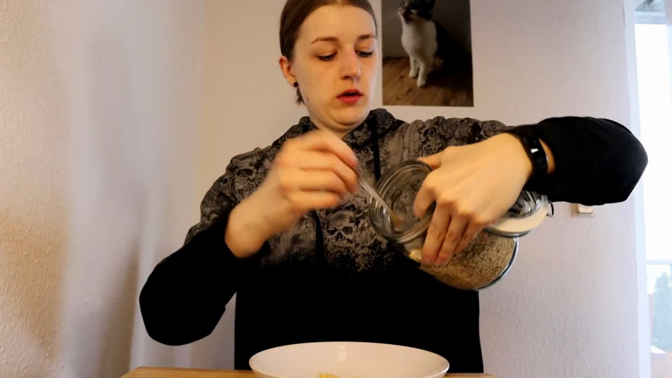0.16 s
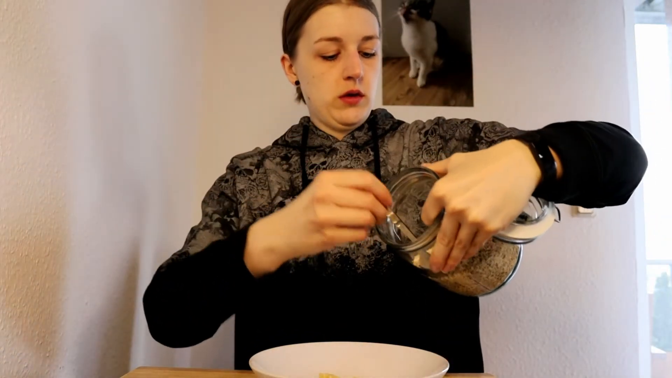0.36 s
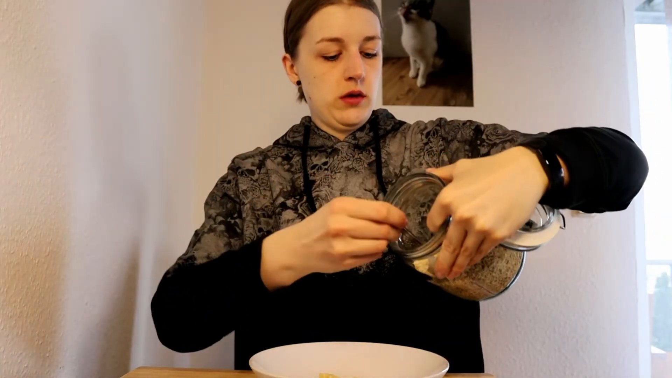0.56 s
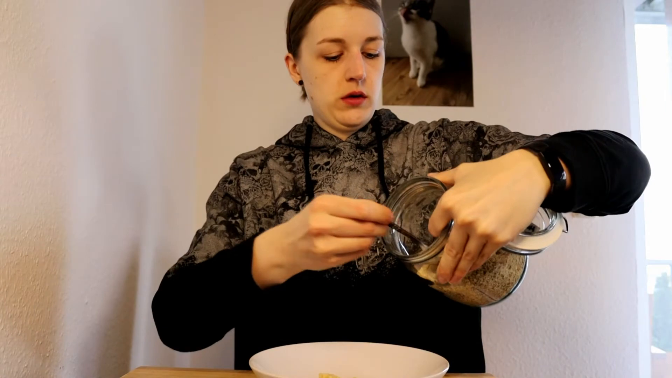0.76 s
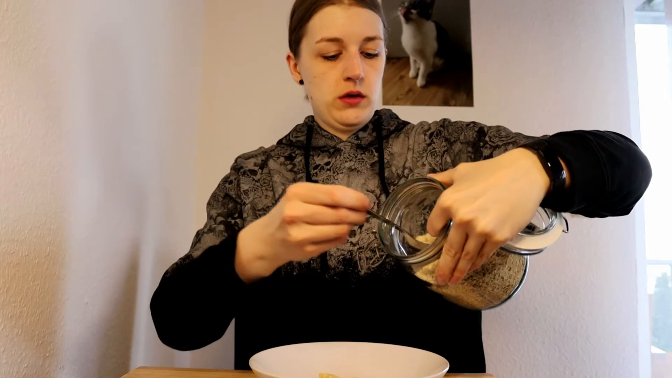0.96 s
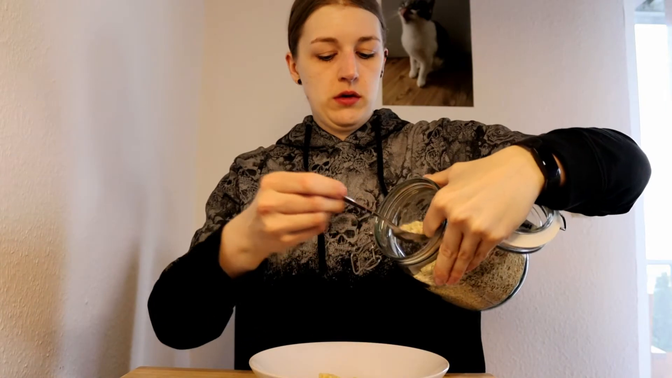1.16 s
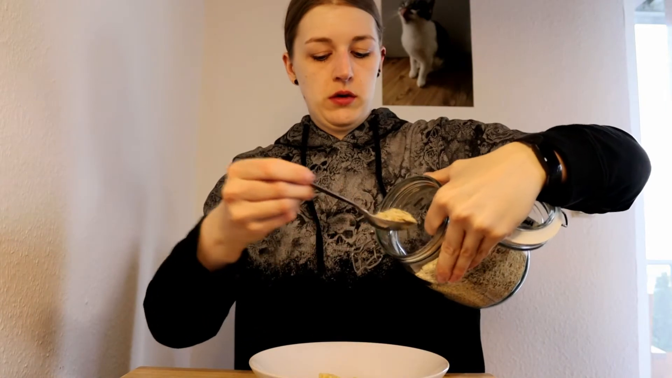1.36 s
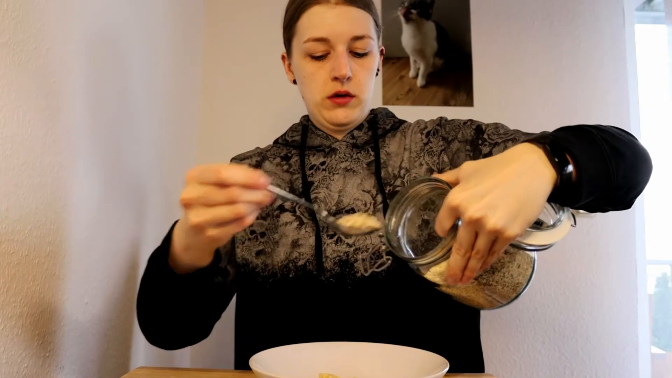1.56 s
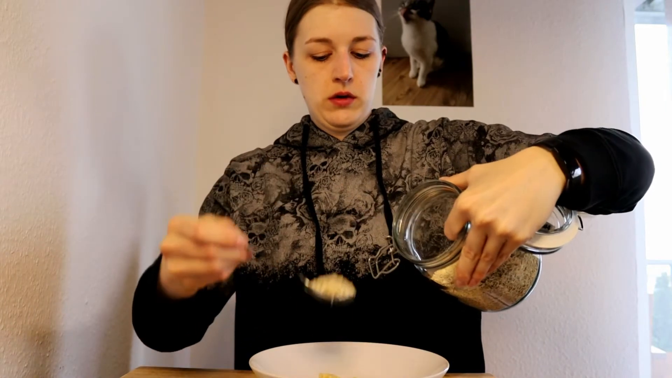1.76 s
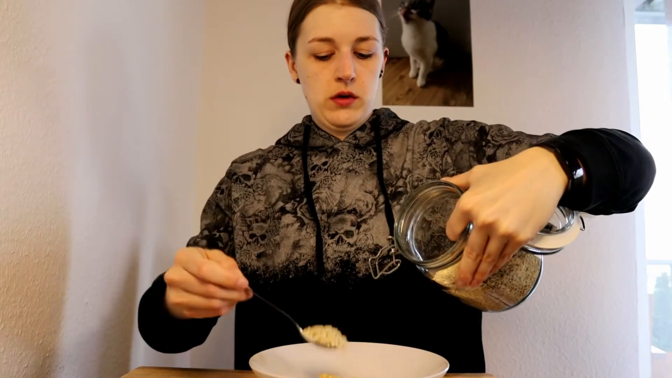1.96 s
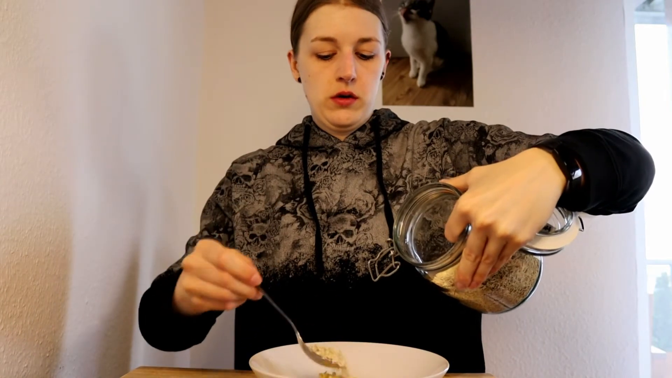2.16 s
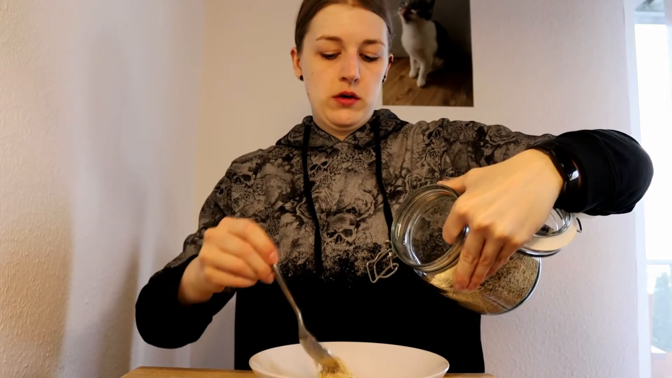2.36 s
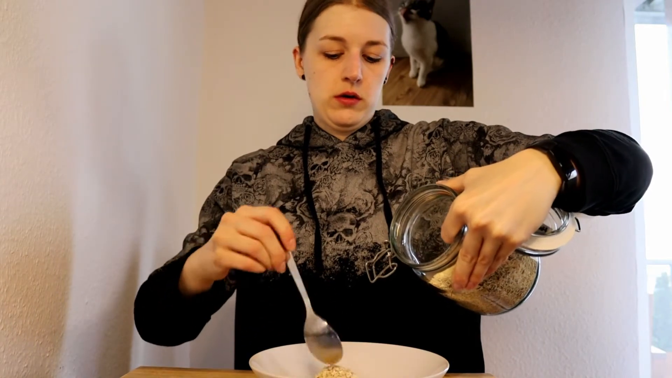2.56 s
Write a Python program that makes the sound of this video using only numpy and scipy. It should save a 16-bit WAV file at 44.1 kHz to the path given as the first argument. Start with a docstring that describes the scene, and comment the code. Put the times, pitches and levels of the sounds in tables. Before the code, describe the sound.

Spoon strikes glass jar rim once, rustles through rolled oats, then flakes patter into a china bowl

```python
"""Spoon, jar and oats

A metal spoon clinks into a glass jar in a small kitchen, digs through rolled oats and tips them into a china bowl.
Jar, spoon and bowl are damped sine modes with coloured noise bursts for contact; dry flakes are dense tiny impacts.
Early reflections and a diffuse tail give the walls' close answer. Behind it lie a low sine hum and
wavering coloured noise: still air, a soft swell like traffic going by outside, and a late drone.
"""
import sys
import numpy as np
from scipy import signal
from scipy.fft import rfft, irfft
from scipy.io import wavfile
from scipy.ndimage import uniform_filter1d

SR = 44100
rng = np.random.default_rng(int(sys.argv[2]) if len(sys.argv) > 2 else 0)


def transcribe(signal):
    """Save signal, clipped to [-1, 1], as a 16-bit WAV file at the path in sys.argv[1]."""
    frames = np.atleast_2d(signal).T
    limited = np.clip(frames, -1, 1)
    pcm = np.round(limited * 32767).astype(np.int16)
    wavfile.write(sys.argv[1], SR, pcm)


N = 114660  # samples, 2.6 s

# Levels inside an object (modes, colours, contact parts) are relative to the level of its events.
# spoon strikes the jar's rim and rebounds softly: start_s, ring_db, crack_db, bright_hz
CLINKS = [(0.2229, -2.5, 0.5, 18500), (0.2646, -0.5, -18, 1500)]
# ring of the rim: pitch_hz, level_db, t60_s
RIM_MODES = [(1502, -10, .25), (1528, -3, .26), (1611, -5, .26), (1626, 1, .29), (1654, -2, .29),
             (1783, -4, .22), (1860, -10, .22), (2530, -6, .13), (3758, -10, .3), (3792, -13, .27),
             (4917, -7, .25), (5062, -7, .22), (8448, -4, .18), (8542, -5, .24), (9060, -6, .11),
             (10595, -2, .12), (12782, -5, .24), (12902, -6, .2), (14450, -5, .1)]
# colour of the hard contact: freq_hz, level_db
CRACK_COLOUR = [(40, -30), (200, -6.5), (480, -14.5), (760, 2.5), (1000, -15.5), (1300, -38.5), (1650, 11),
                (2200, -3.5), (3700, 2), (4300, -0.5), (5100, 8), (6500, -15.5), (7300, -10.5), (8400, 3),
                (9700, -2.5), (10700, 12.5), (12100, -34), (12800, 6), (13700, 2.5), (14500, -5.5),
                (15700, -0.5)]
RIM_DB, CRACK_DB, CRACK_T60_S = -24.5, -5.5, 0.028
SHIVER_DB, SHIVER_T60_S = -24, 0.086
# spoon's edge slides along the glass: start_s, level_db
SCRAPE_LEVEL = [(0, -110), (.3, -71), (.42, -69), (.55, -77), (.63, -78), (.9, -74), (1.2, -100),
                (1.3, -130)]
SCRAPE_LOW_HZ = 4500
# dull knocks on the jar's body: start_s, level_db, bright_hz
KNOCKS = [(0.0180, -41, 2600), (0.0208, -44, 1170), (0.267, -42.5, 1070), (0.7990, -47.5, 670)]
# ring of the jar's body: pitch_hz, level_db, t60_s
BODY_MODES = [(1115, -1, .28), (1180, 2, .28), (1220, 1, .26), (1530, -4, .2), (1650, 4, .05),
              (1928, 2, .22), (1984, 0, .2), (2356, -4, .08), (4030, -6, .04), (4600, -3, .035)]
# colour of a knock's contact: freq_hz, level_db
KNOCK_COLOUR = [(300, -21), (900, -5), (1200, 1.5), (2000, 10),
                (3200, -22), (4600, 6.5), (6500, -19), (12000, -23)]
KNOCK_CONTACT_DB, KNOCK_T60_S = 17, 0.0246
# light taps that ring the spoon: start_s, level_db, bright_hz
TAPS = [(0.7990, -46.5, 2000), (2.062, -48.5, 2800), (2.321, -48.5, 2000)]
# ring of the spoon: pitch_hz, level_db, t60_s
SPOON_MODES = [(1787, -2, .2), (1877, -4, .16), (2000, -6, .05)]
# colour of a tap's thud: freq_hz, level_db
TAP_COLOUR = [(300, -35), (1000, -2), (1400, -8), (1750, 0), (2000, -7), (2500, -30), (8000, -30)]
TAP_THUD_DB, TAP_T60_S = 1.5, 0.07
# rustle of sliding oats: start_s, level_db
RUSTLE_LEVEL = [(0, -63), (.3, -68), (.42, -55.5), (.54, -56.5), (.62, -62), (.8, -59.5), (.9, -58),
                (1.02, -62), (1.15, -65), (1.3, -67), (2.1, -70.5), (2.26, -58.5), (2.3, -54.5),
                (2.6, -55.5)]
# colour of dry flakes: freq_hz, level_db
OAT_COLOUR = [(500, -3), (1500, -0.5), (2500, -1), (4700, 1), (6500, -1), (9500, -1.5), (13000, 1),
              (15500, 0)]
# single flakes snap against the spoon: start_s, level_db
SNAPS = [(0.731, -51), (0.853, -50.5), (0.958, -55), (0.984, -46.5), (1.022, -51.5), (1.179, -44.5),
         (1.214, -47.5), (2.131, -50)]
GRAINS_PER_S, GRAIN_SPREAD_DB, FLAKE_T60_S = 2200, 2.5, 0.024
# single flakes drop into the bowl: start_s, level_db
DROPS = [(1.9521, -50), (1.961, -59), (2.0491, -42.5), (2.058, -54), (2.202, -53), (2.223, -50.5),
         (2.392, -50.5), (2.458, -51), (2.530, -47), (2.588, -50)]
# ring of the china: pitch_hz, level_db, t60_s
BOWL_MODES = [(2600, -6.5, 0.014), (4020, 3.5, .025), (4340, -11, .025), (6390, 0, .025),
              (6800, -8.5, 0.028), (7960, -2.5, 0.012), (9580, -4.5, 0.057), (10240, -7.5, 0.028),
              (10500, -17, .02), (13040, -3.5, .02), (13800, -18, .015)]
# stream of flakes landing in the bowl: start_s, level_db
POUR_LEVEL = [(0, -110), (2.2, -90), (2.33, -71), (2.39, -52.5), (2.44, -58.5), (2.53, -56.5), (2.6, -65)]
DROP_CONTACT_DB, POUR_FLUTTER_DB = -1, 1
# decay of the kitchen: freq_hz, t60_s
ROOM_T60 = [(200, 0.27), (1600, 0.38), (4000, 0.29), (9000, .2), (15000, 0.2)]
# early reflections: delay_left_s, delay_right_s, level_db
ECHOES = [(.0021, .0017, -16), (.0082, .0093, -5.5), (0.0119, 0.016, -13.5)]
ROOM_DB, ROOM_BUILD_S, JAR_PAN_DB, BOWL_PAN_DB = -9, 0.0027, -0.5, -3
# colour of tyre roar: freq_hz, level_db
TYRES_COLOUR = [(250, -15), (470, -1), (640, -4.5), (840, 1.5), (960, 3), (1200, -3), (1600, -7.5),
                (2200, -19.5), (4000, -42)]
# swell of the tyres: start_s, level_db
TYRES_LEVEL = [(0, -63), (.6, -59.5), (1.0, -56.5), (1.25, -51), (1.7, -49), (2.0, -50.5), (2.3, -53),
               (2.6, -54.5)]
# colour of low traffic rumble: freq_hz, level_db
RUMBLE_COLOUR = [(40, -22), (100, 0), (150, -9.5), (180, 10), (205, 2), (245, 1.5), (320, 5), (420, -2),
                 (470, -1), (700, -28.5)]
# swell of the rumble: start_s, level_db
RUMBLE_LEVEL = [(0, -67), (.42, -83), (.54, -52), (.62, -61), (1.0, -55.5), (1.5, -55.5), (1.93, -52),
                (2.1, -50), (2.4, -54.5), (2.6, -55.5)]
# colour of a deeper drone: freq_hz, level_db
DRONE_COLOUR = [(25, 6), (55, -4), (80, -10), (112, 8.5), (145, -1.5), (176, 8.5), (230, -7), (500, -31)]
# late rise of the drone: start_s, level_db
DRONE_LEVEL = [(0, -71.5), (2.15, -85), (2.42, -53.5), (2.6, -63)]
# colour of the still room: freq_hz, level_db
FLOOR_COLOUR = [(20, -33.5), (40, -5.5), (75, -13), (110, -0.5), (180, -1.5), (300, -0.5), (600, -8),
                (1000, -3.5), (2000, -17), (4000, -20.5), (9000, -32.5), (15500, -45.5)]
FLOOR_DB, HUM_HZ, HUM_DB = -55, 55.8, -69
ALIKE_BELOW_HZ, FLICKER_DB = 710, 0.77
RING_SPREAD_RAD, CRACK_WIDTH = 0.93, 0.78  # phase lag between the microphones; side share of a contact
RADIATE_HZ = 1086  # the ringing objects radiate little below this
TOP_HZ = 15650  # upper limit of the recorder


def clink():
    """Steel strikes the rim: a hard crack, a longer shiver of the same colour, and the main ring."""
    out = 0
    for start_s, ring_db, crack_db, bright_hz in CLINKS:
        crack = undb(CRACK_DB) * burst(CRACK_COLOUR, CRACK_T60_S)
        shiver = undb(SHIVER_DB) * burst(CRACK_COLOUR, SHIVER_T60_S)
        contact = undb(crack_db) * soften(crack + shiver, bright_hz)
        rim = undb(RIM_DB + ring_db) * ring(RIM_MODES, bright_hz)
        out = out + place(contact + rim, start_s)
    return out


def scrape():
    """Steel slides on glass: tiny catches keep the high rim modes faintly alive."""
    rubbed = convolve(grains(), ring(RIM_MODES))
    high_pass = signal.butter(2, SCRAPE_LOW_HZ, "high", fs=SR, output="sos")
    return unit(signal.sosfilt(high_pass, rubbed)) * level_curve(SCRAPE_LEVEL)


def knocks():
    """Softer blows on the jar's wall excite its body modes and a short dull contact."""
    out = 0
    for start_s, level_db, bright_hz in KNOCKS:
        contact = soften(burst(KNOCK_COLOUR, KNOCK_T60_S), bright_hz)
        blow = ring(BODY_MODES, bright_hz) + undb(KNOCK_CONTACT_DB) * contact
        out = out + undb(level_db) * place(blow, start_s)
    return out


def taps():
    """Light taps ring the spoon's own modes over a small thud."""
    out = 0
    for start_s, level_db, bright_hz in TAPS:
        tap = ring(SPOON_MODES, bright_hz) + undb(TAP_THUD_DB) * burst(TAP_COLOUR, TAP_T60_S)
        out = out + undb(level_db) * place(tap, start_s)
    return out


def oats():
    """Flakes slide over each other and the spoon as dense tiny impacts; a few snap singly."""
    slide = colour(np.array([grains(), grains()]), OAT_COLOUR) * level_curve(RUSTLE_LEVEL)
    snaps = sum(undb(db) * place(burst(OAT_COLOUR, FLAKE_T60_S), s) for s, db in SNAPS)
    return slide + snaps


def bowl():
    """Single flakes and a fluttering stream of tiny impacts ring the china."""
    china = ring(BOWL_MODES)
    drops = 0
    for start_s, level_db in DROPS:
        flake = china + undb(DROP_CONTACT_DB) * burst(OAT_COLOUR, FLAKE_T60_S)
        drops = drops + undb(level_db) * place(flake, start_s)
    stream = unit(convolve(grains(), china)) * level_curve(POUR_LEVEL)
    return drops + stream * undb(POUR_FLUTTER_DB * walk(50))


def kitchen(x):
    """Table and near walls reflect first; a diffuse tail follows, shortest in the treble."""
    noise = rfft(rng.standard_normal((2, N)))
    centres_hz = [hz for hz, _ in ROOM_T60]
    tail = 0
    # crossfading bands, each with its own decay
    for share, (_, t60) in zip(np.eye(len(ROOM_T60)), ROOM_T60):
        band = irfft(noise * over_bins(list(zip(centres_hz, share))), N)
        tail = tail + band * fade(t60)
    tail = tail * (1 - np.exp(-clock() / ROOM_BUILD_S))
    early = sum(undb(db) * np.array([impulse(left), impulse(right)]) for left, right, db in ECHOES)
    late = undb(ROOM_DB) * unit(tail) / np.sqrt(N)  # unit energy before its level
    return x + convolve(x, early + late)


def hum():
    """One low sine whose level wanders by about 2 dB."""
    wander = undb(HUM_DB + 2 * walk(11))
    return wander * unit(np.sin(2 * np.pi * HUM_HZ * clock()))


def traffic():
    """Wavering coloured noise swells outside: tyre roar peaks first, low rumble after."""
    tyres = diffuse(TYRES_COLOUR) * level_curve(TYRES_LEVEL) * undb(FLICKER_DB * walk(11))
    rumble = diffuse(RUMBLE_COLOUR) * level_curve(RUMBLE_LEVEL) * undb(FLICKER_DB * walk(18))
    return tyres + rumble


def still_air():
    """Steady coloured noise of the quiet room."""
    return undb(FLOOR_DB) * diffuse(FLOOR_COLOUR)


def drone():
    """Deep diffuse noise that rises late."""
    return diffuse(DRONE_COLOUR) * level_curve(DRONE_LEVEL)


def diffuse(rows):
    """Noise from all around, alike left and right only in the bass."""
    mid, side = rfft(rng.standard_normal((2, N)))
    alike = 1 / (1 + (np.fft.rfftfreq(N, 1 / SR) / ALIKE_BELOW_HZ) ** 2)
    spread = np.array([[1], [-1]]) * side * np.sqrt(1 - alike)
    return colour(irfft(mid * np.sqrt(1 + alike) + spread, N), rows)


def ring(modes, bright_hz=None):
    """Damped sines at the two microphones; a soft contact weakens the high ones."""
    out = np.zeros((2, N))
    lag = np.array([[0], [RING_SPREAD_RAD]])
    for hz, db, t60 in modes:
        soft = 1 if bright_hz is None else 1 / np.hypot(1, (hz / bright_hz) ** 2)
        out += soft * undb(db) * fade(t60) * np.sin(2 * np.pi * hz * clock() - lag)
    return signal.sosfilt(signal.butter(3, RADIATE_HZ, "high", fs=SR, output="sos"), out)


def burst(rows, t60):
    """Decaying contact noise coloured by the struck object, partly different left and right."""
    mid, side = rng.standard_normal((2, N))
    pair = np.array([mid + CRACK_WIDTH * side, mid - CRACK_WIDTH * side])
    push = pair * fade(t60) / np.hypot(1, CRACK_WIDTH)
    # fold the cepstrum to minimum phase, so the colour starts with the blow
    cepstrum = irfft(np.log(unit(undb(over_bins(rows)))), N)
    cepstrum[1:N // 2] *= 2
    cepstrum[N // 2 + 1:] = 0
    return irfft(rfft(push) * np.exp(rfft(cepstrum)), N)


def grains():
    """Dense tiny impacts of uneven size and random sign."""
    hit = rng.random(N) < GRAINS_PER_S / SR
    sign = rng.choice([-1, 1], N)
    size = undb(GRAIN_SPREAD_DB * np.minimum(rng.exponential(size=N), 5))
    return hit * sign * size


def walk(rate):
    """Slow random wander of rms 1: held random values, smoothed twice."""
    k = int(SR / rate)
    steps = np.repeat(rng.standard_normal(200), k)[:N]
    return unit(uniform_filter1d(uniform_filter1d(steps, k), k))


def soften(x, hz):
    """Low-pass of a soft contact."""
    return signal.sosfilt(signal.butter(2, min(hz, SR * .45), fs=SR, output="sos"), x)


def colour(x, rows):
    """Give a signal a spectrum; rms 1."""
    return unit(irfft(rfft(x) * undb(over_bins(rows)), N))


def over_bins(rows):
    """Read (Hz, value) points at every frequency bin, along log frequency."""
    hz, value = np.array(rows).T
    return np.interp(np.log(np.fft.rfftfreq(N, 1 / SR) + 1), np.log(hz), value)


def level_curve(rows):
    """Gain over time from (s, dB) points."""
    return undb(np.interp(clock(), *np.array(rows).T))


def fade(t60):
    """Exponential decay from time zero, down 60 dB after t60 seconds."""
    return np.exp(-np.log(1000) * clock() / max(t60, 1e-3))


def place(x, s):
    """Start a sound at time s."""
    k = int(np.clip(round(s * SR), 0, N - 1))
    out = np.zeros_like(x)
    out[..., k:] = x[..., :N - k]
    return out


def impulse(s):
    """Single unit sample at time s."""
    x = np.zeros(N)
    x[int(np.clip(round(s * SR), 0, N - 1))] = 1
    return x


def convolve(x, response):
    """Pass each channel through a response, cut to the scene's length."""
    return signal.fftconvolve(np.atleast_2d(x), np.atleast_2d(response), axes=-1)[:, :N]


def pan(db):
    """Left and right gains that differ by db; positive leans left."""
    return undb(np.array([[db], [-db]]) / 2)


def clock():
    """Time of every sample in seconds."""
    return np.arange(N) / SR


def unit(x):
    """Scale to rms 1."""
    return x / np.sqrt(np.mean(x ** 2))


def undb(db):
    """Decibels to amplitude gain."""
    return 10 ** (np.asarray(db) / 20)


def scene():
    """Jar, spoon, oats and bowl sound in the kitchen, over the background."""
    jar = clink() + scrape() + knocks() + taps() + oats()
    indoors = kitchen(pan(JAR_PAN_DB) * jar + pan(BOWL_PAN_DB) * bowl())
    return indoors + hum() + traffic() + still_air() + drone()


def record(dry):
    """The recorder clips at full scale and cuts the top with a steep low-pass."""
    low_pass = signal.ellip(10, .2, 70, TOP_HZ, fs=SR, output="sos")
    return signal.sosfilt(low_pass, np.clip(dry, -1, 1))


dry = scene()
out = record(dry)
transcribe(out)
```